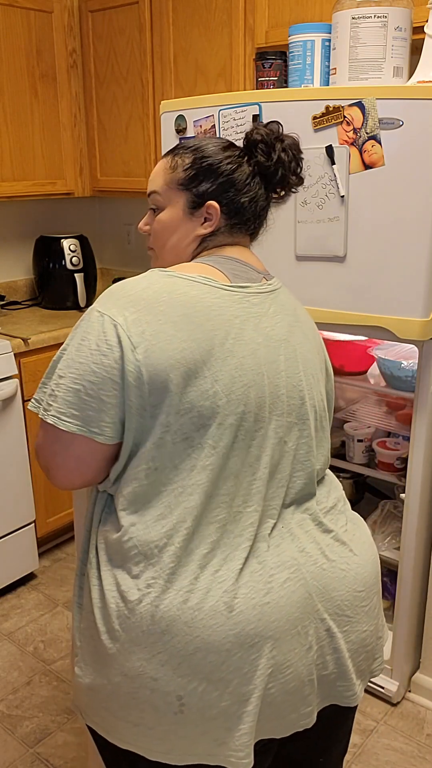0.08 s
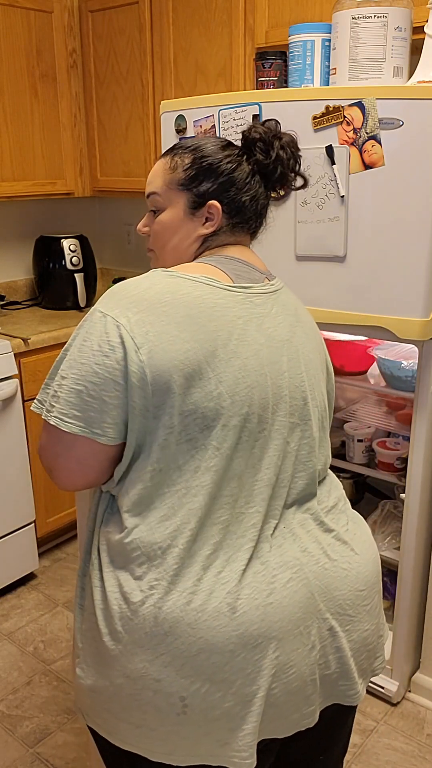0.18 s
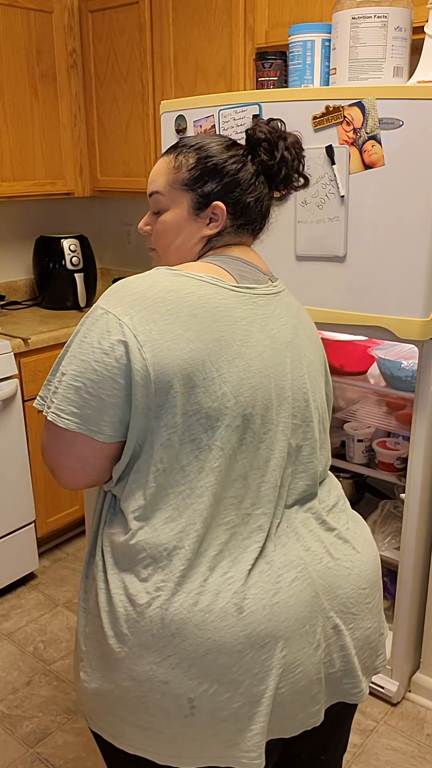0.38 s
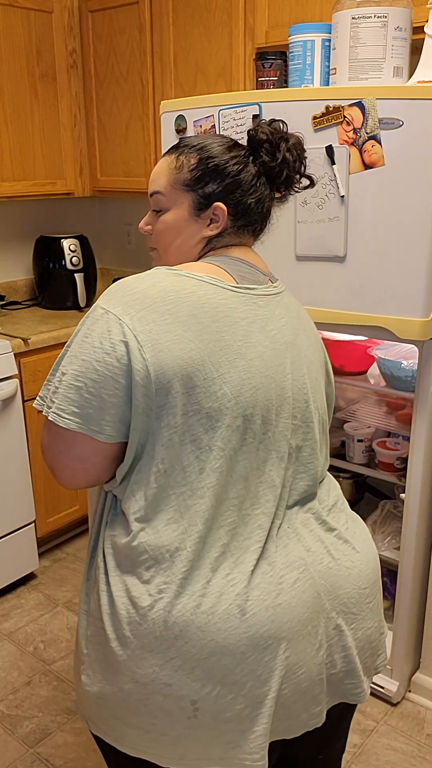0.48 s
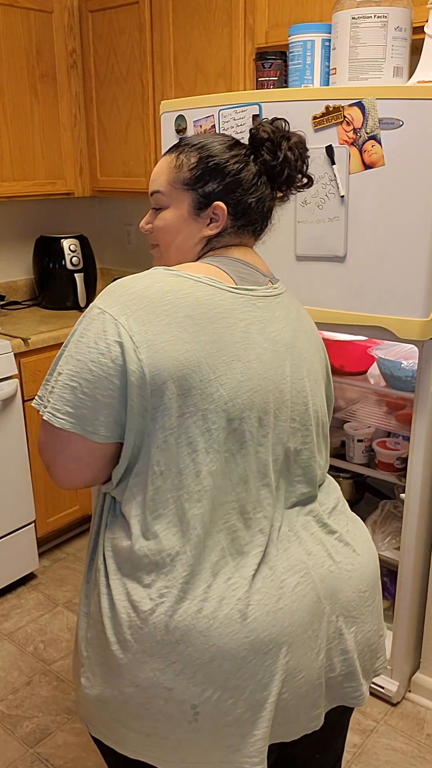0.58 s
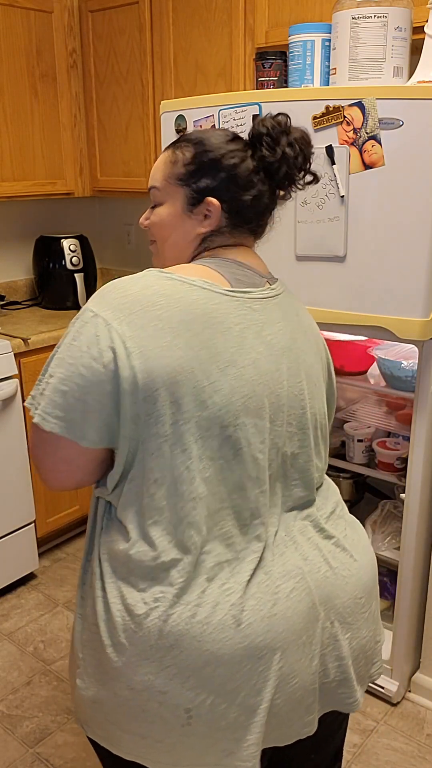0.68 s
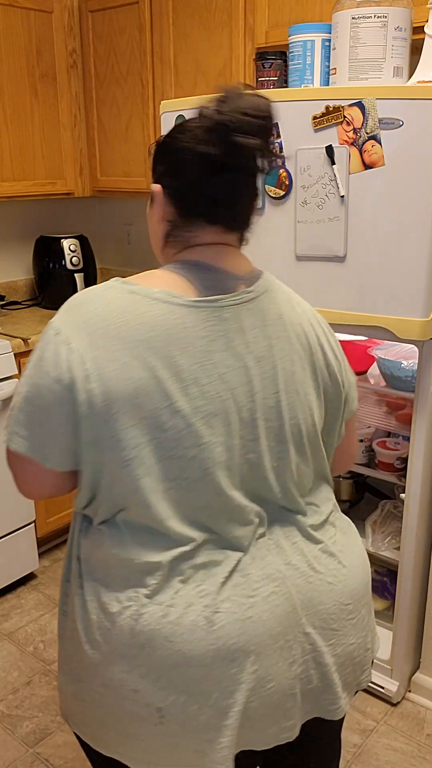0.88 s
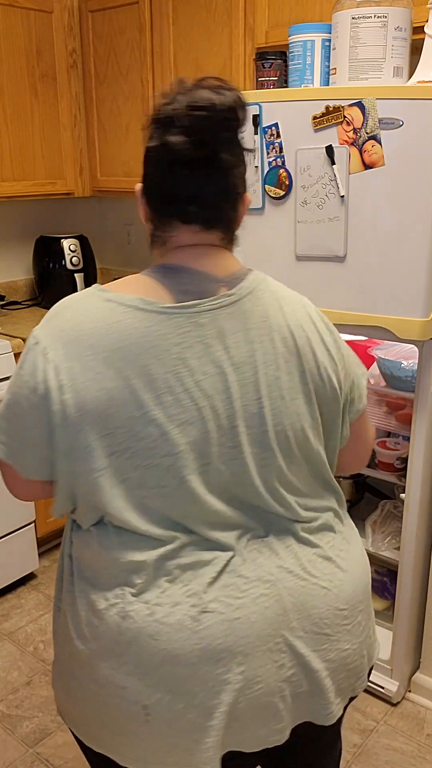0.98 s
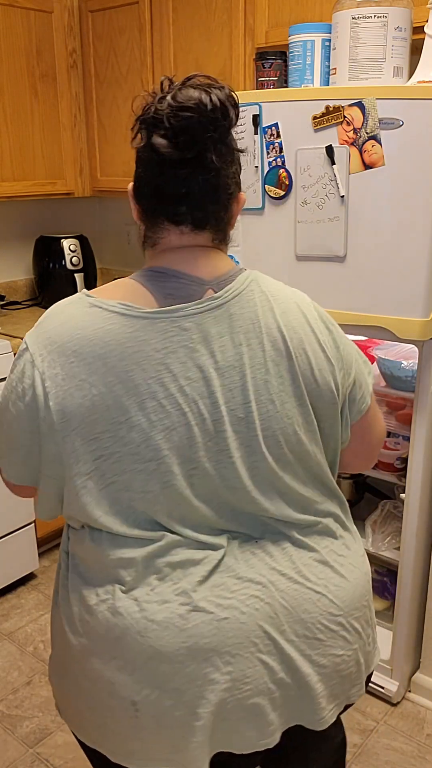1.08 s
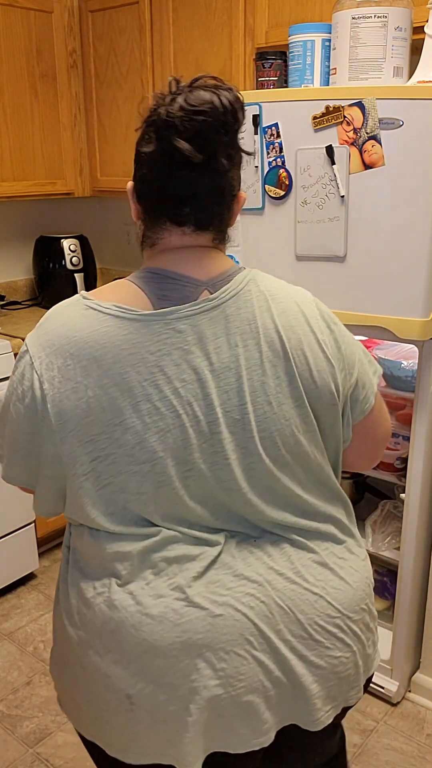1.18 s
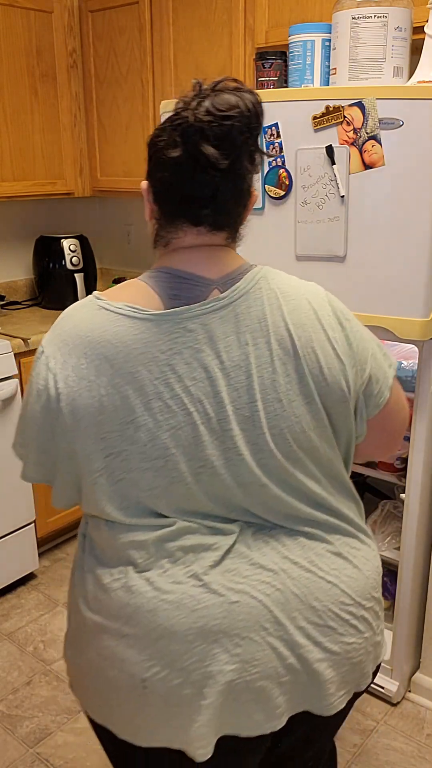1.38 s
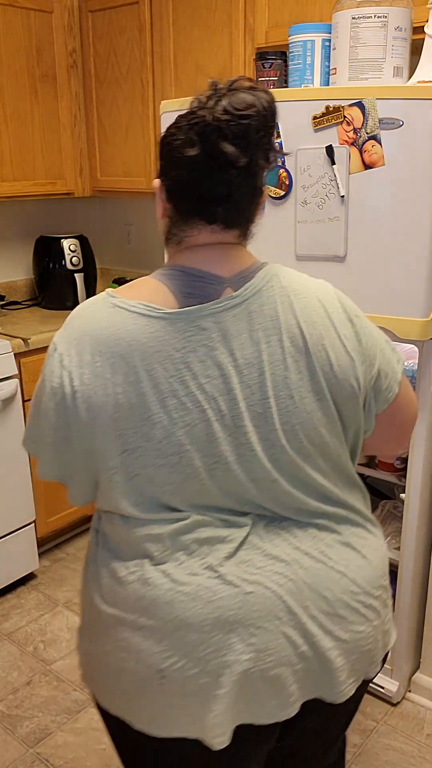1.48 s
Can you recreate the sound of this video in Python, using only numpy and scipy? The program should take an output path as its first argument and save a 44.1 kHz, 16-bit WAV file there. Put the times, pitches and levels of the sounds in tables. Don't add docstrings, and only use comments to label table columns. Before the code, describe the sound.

A loud clattering thud of a load landing on refrigerator shelves, in a lively kitchen with low compressor hum. Faint plastic taps come first, hollow clacks at 0.22 seconds, then the main crash at 0.3-0.35 with ringing panels and bright glass clinks. Knocks and dull settling bumps fade from 0.43 to 0.8. Tiny wrapper ticks follow near 0.98 and 1.1, with soft rustling until about 1.35.

```python
import sys
import numpy as np
from scipy import signal
from scipy.fft import rfft, irfft, next_fast_len
from scipy.io import wavfile
from scipy.ndimage import map_coordinates

SR = 44100
rng = np.random.default_rng(int(sys.argv[2]) if len(sys.argv) > 2 else 0)


def bounce(signal):
    frames = np.transpose(np.atleast_2d(signal))
    limited = np.clip(frames, -1, 1)
    pcm = np.round(limited * 32767).astype(np.int16)
    wavfile.write(sys.argv[1], SR, pcm)


def undo_db(level):
    steps = np.asarray(level, float) / 20
    return 10 ** steps


N = 68355
LEAD_S = .3
M = N + round(LEAD_S * SR)


def unit(x):
    return x / np.sqrt(np.mean(x ** 2) + 1e-20)


def along(points, hz):
    f, v = np.transpose(points)
    return np.interp(np.log(hz + 1), np.log(f + 1), v)


def filtered(x, response):
    m = next_fast_len(x.shape[-1] + 8192)
    spectrum = rfft(x, m) * response(np.fft.rfftfreq(m, 1 / SR))
    return irfft(spectrum, m)[..., :x.shape[-1]]


def causal(gain):
    cepstrum = irfft(np.log(np.maximum(gain, 1e-4)))
    half = len(cepstrum) // 2
    cepstrum[1:half] *= 2
    cepstrum[half + 1:] = 0
    return np.exp(rfft(cepstrum))


def add(out, s, x):
    part = out[:, round((s + LEAD_S) * SR):][:, :x.shape[1]]
    part += x[:, :part.shape[1]]


def noise_pair(count, gate=1):
    # hz, likeness (1 = same)
    alike = [(60, 1), (120, 1), (180, .7), (350, 0.93), (700, 0.33), (1400, -0.13), (4000, 0.019)]

    def mid_side(hz):
        turn = np.arccos(np.clip(along(alike, hz), -1, 1)) / 2
        return np.array([np.cos(turn), np.sin(turn)])

    mid, side = filtered(gate * rng.standard_normal((2, count)), mid_side)
    return np.array([mid + side, mid - side])


def placed(direct, drive, kind, build_s=.003):
    # hz, t60_s (time to fall 60 dB)
    kitchen = [(60, 0.86), (250, 0.69), (700, 0.75), (2000, 0.68), (6000, 0.55), (10000, 0.53),
               (15000, 0.34)]
    wet_db = {"clack": 1.5, "thud": 2, "tick": 0, "clink": -6, "panel": -13}
    pan_db = {"clack": -0.5, "thud": 0, "tick": -1, "clink": -8, "panel": -1.5}
    hz, t, z = signal.stft(noise_pair(SR), SR, nperseg=256)
    fade = undo_db(-60 * t / along(kitchen, hz)[:, None])
    tail = signal.istft(z * fade, SR, nperseg=256)[1]
    tail = tail * (1 - np.exp(-np.arange(tail.shape[1]) / SR / build_s))
    wet = signal.fftconvolve(drive[None], tail / np.linalg.norm(tail[0]), axes=1)
    out = undo_db(wet_db[kind]) * wet
    add(out, -LEAD_S, direct)
    return undo_db(pan_db[kind] * np.array([[.5], [-.5]])) * out


def contacts(count):
    per_s, spread_db = 9000, 2
    draw = rng.random((count, 2))
    hit = draw[:, 0] < per_s / SR
    return noise_pair(count, hit * undo_db(-spread_db * np.log(draw[:, 1] + 0.00084)))


def blows(rows, gain, kind):
    out, t = np.zeros((2, M)), np.arange(SR // 4) / SR
    for s, db, length, tilt_db in rows:
        shape = np.clip(1.3 - t / length, 0, 1) * (1 - np.exp(-t / 0.00048))
        x = np.vstack([contacts(len(t)) * shape, t == 0])
        x = filtered(x, lambda hz: causal(gain(hz) * undo_db(tilt_db * np.log2((hz + 50) / 2000))))
        x = undo_db(db) * x * np.sqrt(length * SR / np.sum(x ** 2, axis=1, keepdims=True))
        add(out, s, placed(x[:2], x[2], kind, build_s=0.11 * length))
    return out


def ringing(rows, kind, attack_cycles, wander):
    out, t = np.zeros((2, M)), np.arange(SR // 2) / SR
    port_lag_s = .0003
    for s, hz, db, t60 in rows:
        drift = wander * map_coordinates(rng.standard_normal(40), [t * 70])
        swell = undo_db(db - 60 * t / t60) * (1 - np.exp(-t * hz / attack_cycles))
        x = swell * np.sin(2 * np.pi * hz * (t + [[0], [port_lag_s]]) + drift)
        add(out, s, placed(x, x[0], kind))
    return out


def fridge():
    # pitch_hz, level_db
    hum_lines = [(59, -55), (120, -65), (180, -66), (240, -76.5)]
    # hz, level_db (per Hz)
    air_colour = [(18, -42.5), (35, -28), (64, -14), (90, -20.5), (130, -20.5), (245, -25), (460, -26),
                  (1500, -43.5), (3000, -66.5), (8500, -62.5), (16000, -65)]
    wobble_db, air_db = 0.5, -59
    t = np.arange(M) / SR

    def slow():
        return map_coordinates(rng.standard_normal(60), [t * 14])

    hum = 0
    for hz, db in hum_lines:
        level = undo_db(db + 0.5 + wobble_db * slow())
        hum = hum + level * np.sin(2 * np.pi * hz * t + 0.52 * slow())
    return hum + undo_db(air_db) * unit(filtered(noise_pair(M), lambda hz: undo_db(along(air_colour, hz))))


def plastic_clacks():
    # start_s, level_db, contact_s,
    # brightness_db (per octave)
    clack_rows = [(-.06, -36, 0.0056, 4.5), (.062, -41, 0.024, 0), (.066, -41.5, 0.023, 3),
                  (.2172, -25.5, 0.018, -1.5), (.2205, -28, 0.02, 1.5), (.229, -27.5, 0.01, -1.5),
                  (.25, -36, 0.0043, -2), (.288, -33, 0.0081, -2), (.295, -23, 0.0082, -1.5),
                  (.3, -20.5, 0.016, -1), (.312, -18.5, 0.024, 1), (.36, -36, 0.087, -0.5),
                  (.43, -38, 0.062, 0.5), (.597, -47.5, .07, 1), (.768, -60, 0.035, 1.5),
                  (1.105, -56.5, 0.016, 1.5), (0, -48, 0.015, 3), (.103, -49, 0.0044, -3),
                  (.255, -36.5, 0.0039, -1.5), (.3465, -21, 0.0012, 0)]
    # hz, level_db (per Hz)
    plastic = [(120, -44.5), (260, -23), (400, -8.5), (800, -4), (1300, -5.5), (2910, -8), (8000, -18.5),
               (10500, -25.5), (16000, -28.5)]
    return blows(clack_rows, lambda hz: undo_db(along(plastic, hz)), "clack")


def cabinet(hz):
    # hz, level_db (per Hz)
    load = [(24, -60.5), (42, -15.5), (90, -9), (197, -3), (339, 0.5), (410, -1), (550, -1), (722, -7),
            (989, -3), (6000, -31.5), (7800, -52), (13200, -120)]
    # pitch_hz, width_hz, level_db
    resonances = [(142, 65, 3), (206, 9.8, 6.5), (268, 25, -17.5), (408.8, 10, 6), (446, 7.9, 0.5),
                  (518, 20, -2), (691, 87, 7), (702.4, 18, 1), (910, 33, -2.5), (1170, 100, 1),
                  (1715, 270, 3)]
    peaks = sum(undo_db(2 * db) * w * w / (4 * (hz - c) ** 2 + w * w) for c, w, db in resonances)
    return undo_db(along(load, hz)) * np.sqrt(0.54 + peaks)


def load_thuds():
    # start_s, level_db, contact_s, brightness_db (per octave)
    thud_rows = [(-.04, -42.5, 0.046, -2.5), (.228, -39, 0.059, -3), (.306, -20, 0.028, 1),
                 (.336, -18.5, 0.027, 0.5), (.372, -40, 0.0088, -1), (.44, -28, 0.036, 0.5),
                 (.556, -48.5, 0.015, 8), (.605, -37.5, 0.062, 0), (.67, -46.5, 0.017, -1),
                 (.755, -47, 0.037, 0), (.96, -57, 0.08, -3.5), (1.126, -49.5, 0.0039, -1.5),
                 (1.143, -57.5, 0.0093, -1), (.648, -32.5, 0.0064, -3.5)]
    return blows(thud_rows, cabinet, "thud")


def panels():
    # start_s, pitch_hz, level_db, t60_s
    struck = [(.22, 380, -28.5, 0.27), (.218, 690, -35, 0.35), (0.24, 1500, -32.5, .2),
              (0.26, 700, -32.5, 0.21), (0.12, 120, -45.5, 0.36), (.297, 136, -14.5, 0.11),
              (.306, 415, -12, 0.15), (.32, 453.3, -20, 0.33), (.33, 725, -13, 0.29), (.325, 268, -22, .35),
              (.345, 178, -18.5, 0.26), (.344, 420, -13, 0.12), (.378, 680, -17, .25),
              (.435, 715, -21.5, 0.13), (.375, 135, -23, 0.3), (.43, 400, -24, 0.24),
              (0.33, 208, -24, 0.44), (.33, 876.4, -20, 0.35), (0.3, 1095, -20.5, 0.37),
              (.49, 1040, -33, 0.25), (0.28, 50, -32, .3), (.305, 660, -18.5, 0.19), (.31, 980, -17.5, .15),
              (.47, 470, -27, 0.34), (0.36, 1150, -25, 0.32), (.44, 462, -28.5, 0.31),
              (0.36, 600, -34, 0.18)]
    # start_s, pitch_hz, level_db, t60_s
    settled = [(.572, 200, -31, .12), (.6, 412, -28, .22), (.6, 640, -35, .3), (.615, 190, -29, .2),
               (.636, 314, -27, .14), (.636, 490, -30, .14), (.67, 85, -30, .14), (.695, 318, -32, .2),
               (.75, 410, -36, .22), (.812, 410, -43, .1), (.8, 670, -43, .15)]
    return ringing(struck + settled, "panel", attack_cycles=1.1, wander=0.49)


def glass_clinks():
    # start_s, pitch_hz, level_db, t60_s
    clink_rows = [(.298, 6616, -25.5, .068), (.303, 6610, -20, .041), (.298, 9170, -26, .09),
                  (.298, 10460, -34, .08), (.3, 2600, -29, .2), (.3, 3926, -27, .17),
                  (.33, 7400, -29.5, .052), (.35, 7950, -21, .02), (.362, 4050, -29, .3),
                  (.39, 3990, -38, .22), (.42, 6490, -38, .1), (.784, 1820, -51, .26),
                  (.981, 8000, -64, .05), (1.105, 4400, -55, .06), (1.105, 2376, -64, .05),
                  (1.105, 3350, -60, .05), (1.106, 7500, -53, .04), (1.105, 5270, -55, .02),
                  (1.105, 6280, -62, .06), (1.245, 8050, -65, .15)]
    return ringing(clink_rows, "clink", attack_cycles=2, wander=0.29)


def wrapper_ticks():
    # start_s, level_db, contact_s, brightness_db (per octave)
    tick_rows = [
        (.945, -69.5, .03, -5.5),
        (.982, -54.5, .005, -1.2),
        (.992, -59, .02, 1.5),
        (1.105, -51, .003, -2),
        (1.1075, -48.5, 0.00301, -4.5),
        (1.113, -57, .012, -1),
        (1.125, -66.5, 0.084, 1.1),
        (1.485, -87, .07, 4),
    ]
    # hz, level_db (per Hz)
    film = [(1500, -23.5), (2700, -16), (3700, -7.5), (6400, -9), (7800, -2), (9000, -6), (12000, -11),
            (16000, -19.5)]
    return blows(tick_rows, lambda hz: undo_db(along(film, hz)), "tick")


def wrapper_rustle():
    # time_s, level_db
    swell = [
        (1.139, -78),
        (1.201, -68),
        (1.235, -63),
        (1.27, -65),
        (1.31, -74),
        (1.37, -90.5),
    ]
    # hz, level_db (per Hz)
    crackle = [(900, -25), (2000, -7), (5000, -5), (8000, -4), (10500, -9.5), (14000, -8), (16000, -12)]
    s, db = np.transpose(swell)
    t = np.arange(M) / SR - LEAD_S
    x = unit(filtered(contacts(M), lambda hz: causal(undo_db(along(crackle, hz)))))
    x = x * undo_db(np.interp(t, s, db, -140, -140))
    return placed(x, x[0], "tick")[:, :M]


def scene():
    x = fridge() + plastic_clacks() + load_thuds() + panels()
    x = x + glass_clinks() + wrapper_ticks() + wrapper_rustle()
    return x[:, M - N:]


def low_pass(x):
    return signal.sosfilt(signal.butter(12, 16810, fs=SR, output="sos"), x)


def record(dry):
    # hz, level_db
    mic = [(30, 1), (8000, 0.5), (11000, -1.5), (15500, 4.5)]
    # hz, level_db
    shade = [(2000, 1), (5000, 0), (10000, -2.5), (15000, -1)]
    top_hz, above_top_db = 15850, -30
    sides = np.array([[.5], [-.5]])
    x = np.pad(dry, [(0, 0), (M - N, M - N)], "reflect", reflect_type="odd")
    x = filtered(x, lambda hz: undo_db(along(mic, hz) + along(shade, hz) * sides))
    x = np.clip(x, -1, 1)

    def top_cut(hz):
        above = undo_db(above_top_db - (hz - top_hz) / 50) * (hz < top_hz + 950)
        return np.where(hz < top_hz, 1, above)

    x = filtered(x, top_cut)
    return low_pass(x[:, M - N:M])


dry = scene()
out = record(dry)
bounce(out)
```